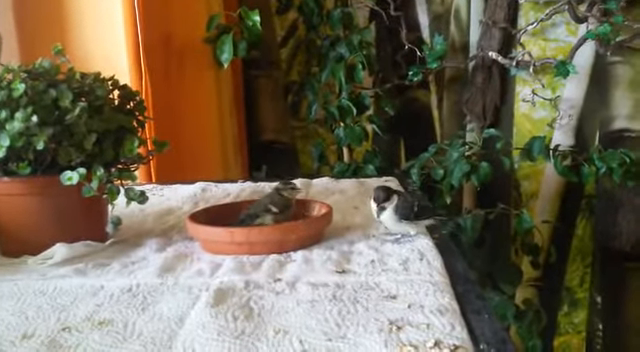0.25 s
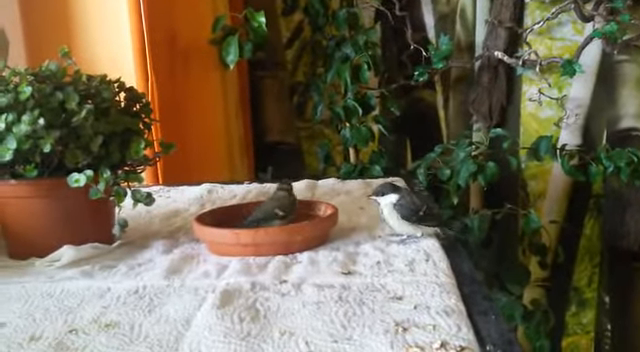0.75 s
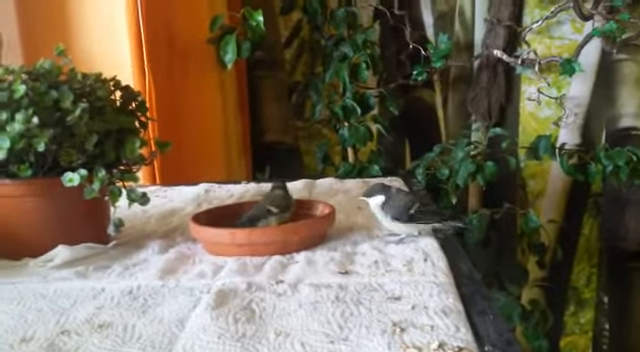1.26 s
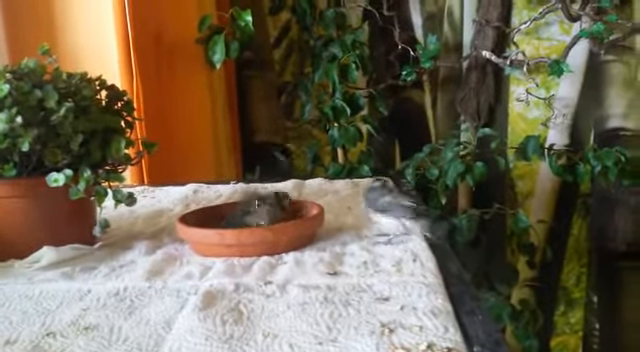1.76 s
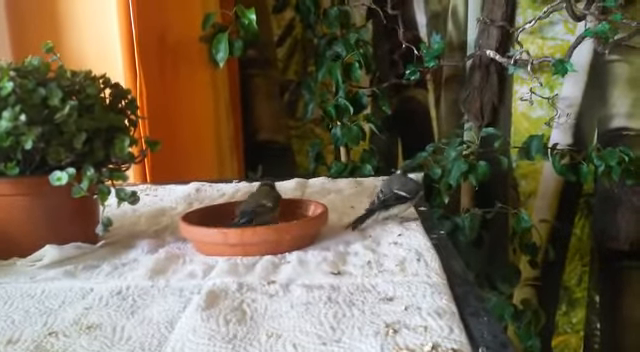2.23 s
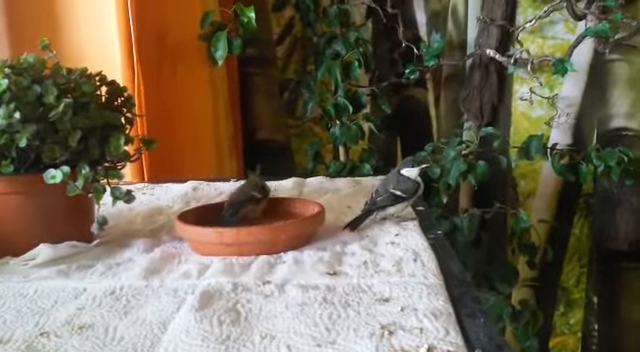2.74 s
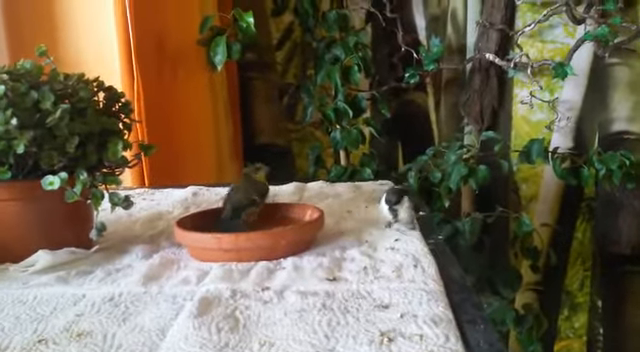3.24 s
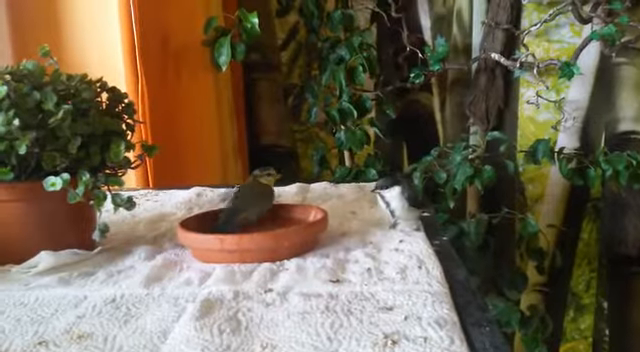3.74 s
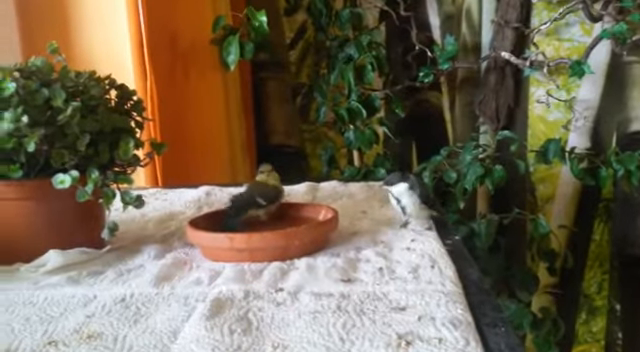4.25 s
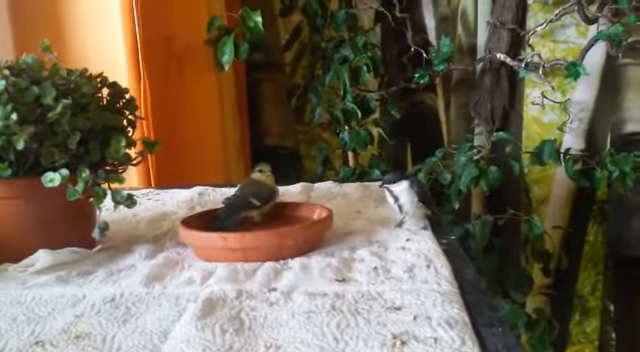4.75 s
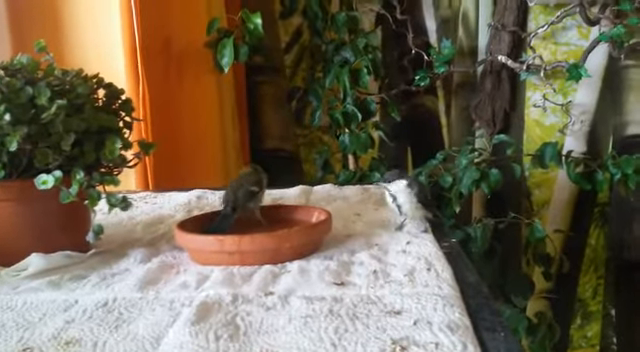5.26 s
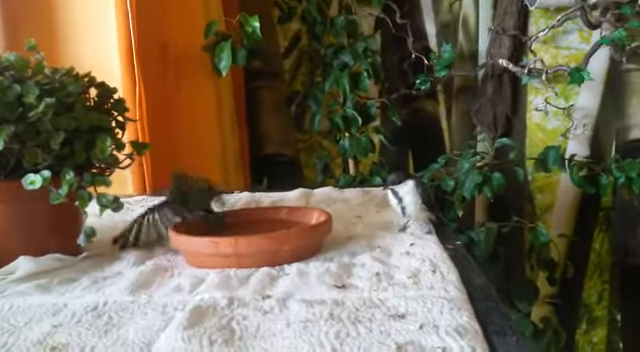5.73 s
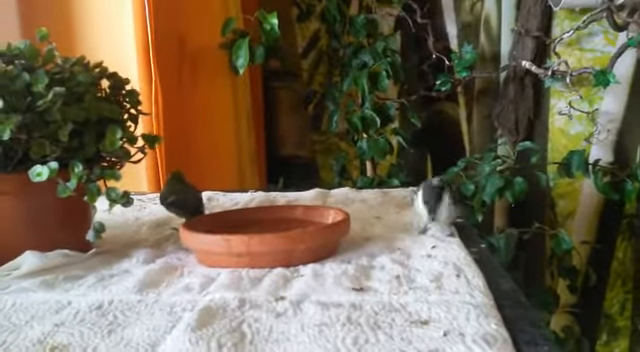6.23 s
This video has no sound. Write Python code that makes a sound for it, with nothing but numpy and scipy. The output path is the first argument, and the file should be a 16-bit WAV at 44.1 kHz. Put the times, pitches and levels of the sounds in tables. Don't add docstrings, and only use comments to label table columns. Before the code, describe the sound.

A small hard-walled room with low hum and thin hiss that rise when something sounds and sink back in the pauses. From 0 to 0.9 s a small bird bathes close by: faint dry feather rustles, brief shaking bouts, light claw ticks and drops on a clay dish. At 0.9-1.5 s a young tit, slightly further off and more echoing, begs with four thin, buzzy, piercing notes around 3-4 kHz with strong overtones near 7 kHz, each jumping up then settling, the last longest. From 1.55 to 2.5 s come more ticks, wing flicks and soft shakes; sharp taps at 2.8 s, a small flick at 3.3 s. The second four-note phrase comes at 3.8-4.4 s, then near quiet. Around 5.2 s a flick and tick; at 5.6-6.3 s the third phrase, with a wing flutter, a clear tap and soft low air thumps, fading into room noise by 6.5 s.

```python
import sys
import numpy as np
from scipy import signal
from scipy.fft import rfft, irfft, next_fast_len
from scipy.io import wavfile
from scipy.ndimage import uniform_filter1d, map_coordinates

SR = 44100
rng = np.random.default_rng(int(sys.argv[2]) if len(sys.argv) > 2 else 0)


def store_wav(level_fs):
    pcm = np.round(np.clip(np.atleast_2d(level_fs), -1, 1) * 32767)
    wavfile.write(sys.argv[1], SR, pcm.T.astype(np.int16))


def invert_db(x):
    u = np.asarray(x, float) / 20
    return 10 ** u


N = 286191
T = np.arange(N) / SR

# (start [s], length [s], first-order lines [dB], second-order lines [dB], arch top [Hz])
BEGGING_NOTES = [(0.907, 0.0895, -47, -40.5, 3670), (1.032, 0.098, -42.5, -37.5, 3811),
                 (1.181, 0.115, -38.5, -35.5, 4028), (1.386, 0.14, -39, -39.5, 4120),
                 (3.785, 0.089, -49.5, -48, 3617), (3.912, .108, -43, -42, 3900),
                 (4.076, 0.12, -40, -38, 4053), (4.282, .12, -41.5, -38.5, 4068),
                 (5.627, 0.09, -46, -43.5, 3538), (5.755, .105, -42, -44.5, 3889),
                 (5.921, 0.14, -38.5, -37.5, 3974), (6.161, .144, -38.5, -38, 4244)]
# (upper voice [Hz], lower voice [Hz], push peak [share of note],
# swell up to it [dB], upper voice at the arch [dB])
PHRASE_PLACES = [
    (3570, 3207, 0.32, 3.5, 2),
    (3645, 3288, .5, 2, -1.7),
    (3630, 3292, .64, 7, -2.1),
    (3612, 3262, 0.81, 8, 1),
]
VOICE_LINES = [(1, 0), (0, 1), (2, -1), (3, -2), (-1, 2), (2, 0), (1, 1), (0, 2), (-1, 3), (3, -1), (3, 0),
               (2, 1), (1, 2), (0, 3), (2, 2), (1, 3), (3, 1)]
ARCH_LINE_DB = [0, -4.5, -14.5, -38, -14.5, -5.5, -14, -3, -11.5, -28, -27, -36, -29.5, -33, -40, -61,
                -32.5]
LOCKED_LINE_DB = [-.8, -11, -7.5, -21, -15, -11.5, -7.5, 1.8, -5, -17.5, -29.5, -44, -31, -26.5, -35, -26,
                  -42]
# (frequency [Hz], level [dB])
BREATH_SPECTRUM = [(2300, -58), (2900, -1), (4000, -8.5), (5200, 7), (7000, -9), (8000, -22), (8600, -2),
                   (14000, -37.5)]
# (frequency [Hz], gain [dB])
THROAT_GAIN = [(2300, -26), (2800, -9.5), (3200, -3.5), (3600, -2), (4300, 1.5), (5200, -4.5), (6500, -0.5),
               (7400, 0), (8100, -0.5), (8500, -23), (9500, -1.5), (14000, 0.5)]
# (start [s], hold [s], level [dB], rise time per 20 dB [s], fall time per 20 dB [s])
SHAKING_BOUTS = [(.001, 0.021, -68.5, -8.34, .021), (.244, 0.044, -71, 0.5, 0.58),
                 (.36, .234, -63.5, 0.3, .025), (.775, .021, -64, .04, 0.4), (.82, .035, -59.5, .1, .05),
                 (1.6, 0.093, -75, .021, .11), (1.708, .003, -65.5, 0.3, 0.33),
                 (2.3, 0.015, -66.5, 0, 0.14), (2.428, .03, -67, 0.1, 0.22)]
# (time [s], level [dB])
WING_FLICKS = [(1.84, -58), (1.992, -66.5), (2.066, -63.5), (3.258, -71), (3.293, -62), (5.18, -63),
               (5.64, -61.5)]
# (frequency [Hz], level [dB])
FEATHER_SPECTRUM = [(900, -24), (1400, -4.5), (2300, -7), (3300, -4.5), (4600, 0.5), (5600, 0.5),
                    (6800, -6), (8500, -11.5), (11000, -15), (14500, -17)]
# (time [s], peak [dB], ring [Hz], ring level [dB])
CLAW_TICKS = [(.0314, -59, 6130, 0.5), (.1612, -60, 5300, 3), (.2029, -59, 5160, 4.18),
              (.256, -64, 5150, 15), (.5304, -58, 3950, 0.5), (.5884, -56.5, 3640, 1.2),
              (.7638, -54, 5030, -6.68), (1.5654, -51, 3624, 7), (1.7087, -51, 4770, 1),
              (1.7665, -58.5, 4650, 6), (1.9906, -52.5, 5070, -5), (2.0584, -59, 3810, 6),
              (2.071, -65, 4940, -6), (2.243, -62, 6850, 7), (2.308, -60, 4260, 6), (2.32, -53.5, 4480, -2),
              (3.115, -68, 4030, 4), (3.2954, -65, 5230, 4.36)]
# (time [s], peak [dB], ring [Hz], ring level [dB])
DROP_TICKS = [(.0097, -52, 3910, -8), (0.4368, -61, 4140, 13.5), (.4668, -49.5, 4150, 2),
              (1.715, -44, 4700, -13), (1.8381, -49.5, 4100, 2.5), (2.4157, -58, 5460, 8),
              (2.7802, -51.5, 6695, -.5), (2.8073, -45.5, 4695, 12.5), (2.8416, -55, 4700, -7),
              (3.2842, -61, 4330, 5), (5.1757, -52.5, 3900, -1), (5.5081, -62, 6790, -1.2),
              (5.6874, -47, 3670, 8.5)]
# (frequency [Hz], level [dB])
CRACK_SPECTRUM = [(1500, -23), (3000, -1), (6000, -0.5), (10000, -4.5), (14000, -10)]
# (frequency [Hz], level [dB])
KNOCK_SPECTRUM = [(250, -27), (600, -4), (1200, -12.5), (2400, -11), (4500, -36)]
# (time [s], peak [dB], pitch [Hz], length [s])
AIR_THUMPS = [(5.75, -49.5, 199, 0.047), (4.42, -53, 84, 0.0525), (5.98, -56, 404, 0.0474),
              (3.32, -59.5, 207, 0.048), (2.04, -62, 390, 0.092), (1.8, -66, 680, 0.03),
              (1.9, -63, 250, 0.086), (1.15, -58, 230, 0.044), (.98, -60.5, 335, 0.52),
              (.03, -64.5, 330, 0.094)]
# (delay [s], level [dB])
WALL_ECHOES = [(.0042, -5), (.0078, -13), (.011, -14.5), (.016, -27), (.023, -15.5)]
# (frequency [Hz], time to fall 60 dB [s])
ROOM_DECAY = [(300, 0.26), (3500, 0.3502), (7000, 0.24), (13000, 0.12)]
# (frequency [Hz], level [dB])
ROOM_NOISE_SPECTRUM = [(12, -27), (20, -18), (27, -13.5), (114, -3.5), (262, -7), (407, -11), (442, -12),
                       (883, -17), (1160, -18.5), (1710, -20), (2980, -22.5), (3930, -24.5), (14800, -29.5)]
# (time [s], room noise level [dB])
HOUSE_STIR = [(0, 2.5), (.6, 1.5), (1.9, 1.5), (2.45, 2.5), (2.7, 0.2), (3.35, 1), (3.65, -0.6), (5, 0.24),
              (6.49, 0.5)]


def unit(x):
    return x / np.sqrt(np.mean(x ** 2) + 1e-20)


def along(points, hz):
    f, v = np.transpose(points)
    return np.interp(np.log(hz + 1), np.log(f + 1), v)


def wobble(rate, size=N):
    knots = rng.standard_normal(int(size * rate / SR) + 4)
    return map_coordinates(knots, [np.arange(size) * rate / SR])


def coloured(x, gain):
    m = next_fast_len(len(x) + 8192)
    return unit(irfft(rfft(x, m) * gain(np.fft.rfftfreq(m, 1 / SR)), m)[:len(x)])


def fade(t, edge):
    return np.clip(np.minimum(t - t[0], t[-1] - t) / edge, 0, 1)


def begging():
    out = np.zeros(N)
    for (start_s, *row), place in zip(BEGGING_NOTES, PHRASE_PLACES * len(BEGGING_NOTES)):
        sound = note(*row, *place)
        out[round(start_s * SR):][:len(sound)] += invert_db(-2.5) * sound
    return irfft(rfft(out) * invert_db(along(THROAT_GAIN, np.fft.rfftfreq(N, 1 / SR))), N)


def note(length, first_db, second_db, top_hz, upper_hz, lower_hz, peak_share, swell_db, lead_db):
    t = np.arange(round(length * SR)) / SR
    top_s, breath_db = 0.033, -14.5
    push = top_hz / upper_hz - 1
    firm = min(push, 0.12)
    upper = arch(t, top_s, top_hz, upper_hz, depth=0.13 + 1.3 * firm, settle=0.007)
    lower_top_hz = lower_hz + 0.6 * (top_hz - upper_hz)
    lower = arch(t, top_s + 0.005, lower_top_hz, lower_hz, depth=0.08 + 0.55 * firm, settle=0.009)
    locked = np.clip((t - top_s - 0.004) / 0.0094, 0, 1)
    jitter = 0.008 + 0.01 * np.clip(1 - t / top_s, 0, 1)
    turns = []
    for hz in (upper, lower):
        unsteady_hz = hz * (1 + 0.003 * wobble(60, len(t)) + jitter * wobble(700, len(t)))
        turns.append(2 * np.pi * np.cumsum(unsteady_hz) / SR)
    first_shape_db, second_shape_db = effort(t, length, peak_share, swell_db)
    first, second = invert_db(first_db + first_shape_db), invert_db(second_db + second_shape_db)
    breath = coloured(rng.standard_normal(len(t)), lambda hz: invert_db(along(BREATH_SPECTRUM, hz)))
    tone = invert_db(breath_db) * (first + second) * breath
    for (m, n), early_db, db in zip(VOICE_LINES, ARCH_LINE_DB, LOCKED_LINE_DB):
        if (m, n) == VOICE_LINES[0]:
            early_db = early_db + lead_db
        if m > 1:
            early_db = early_db + 60 * (firm - 0.12)
        level_db = early_db + locked * (db - early_db) + 3 * wobble(68.0, len(t))
        strength = first if m + n == 1 else second
        line = np.sin(m * turns[0] + n * turns[1] + rng.uniform(0, 2 * np.pi))
        tone += strength * invert_db(level_db) * line
    return tone * fade(t, 0.0034)


def arch(t, top_s, top_hz, rest_hz, depth, settle):
    rise = top_hz * (1 - depth * np.clip(1 - t / top_s, 0, 1) ** 1.2)
    sunk = 1 - np.exp(-(np.maximum(t - top_s, 0) / settle) ** 2)
    return rise + (rest_hz - top_hz) * sunk


def effort(t, length, peak_share, swell_db):
    attack_s, first_attack_db, second_attack_db = 0.02924, 24, 16.5
    first_release_db, second_release_db = 11.5, 17.5
    peak_s = max(peak_share * length, attack_s + 0.002)
    s = [attack_s, peak_s, length]
    sag_db = 74 * (peak_s - attack_s)
    shut = np.clip(1 - t / attack_s, 0, 1) ** 1.83
    first_db = np.interp(t, s, [0, -sag_db, -sag_db - first_release_db]) - first_attack_db * shut
    second_db = np.interp(t, s, [-swell_db, 0, -second_release_db]) - second_attack_db * shut
    return first_db, second_db


def rustle():
    sparks = rng.standard_normal(N) * invert_db(3.2 * wobble(900) + 1.7 * wobble(45))
    grains = coloured(sparks, lambda hz: invert_db(along(FEATHER_SPECTRUM, hz)))
    flick_rise_s, flick_fall_s = 0.0123, 0.0098
    moves = SHAKING_BOUTS + [(s, 0, db, flick_rise_s, flick_fall_s) for s, db in WING_FLICKS]
    t = T[::32]
    level_db = []
    for s, hold, db, rise, fall in moves:
        before_db = 20 * np.maximum((s - t) / rise, 0)
        after_db = 20 * np.maximum((t - s - hold) / fall, 0)
        level_db.append(db - before_db - after_db)
    return invert_db(-0.5 + np.interp(T, t, np.max(level_db, axis=0))) * grains


def ticks():
    out, t = np.zeros(N), np.arange(SR // 6) / SR
    claw_knock_db, drop_knock_db = 1.1, -18.5
    contacts = [(*row, claw_knock_db) for row in CLAW_TICKS]
    contacts += [(*row, drop_knock_db) for row in DROP_TICKS]
    ring_decay = invert_db(-60 * t / 0.0093) + invert_db(-27.5 - 60 * t / 0.13)
    ring_shape = ring_decay * (1 - np.exp(-t / 0.00034))
    crack_shape = invert_db(-1.0 - 60 * t / 0.0022) + invert_db(-9.5 - 60 * t / 0.023)
    for s, db, ring_hz, ring_db, knock_db in contacts:
        crack = coloured(rng.standard_normal(len(t)), lambda hz: invert_db(along(CRACK_SPECTRUM, hz)))
        knock = coloured(rng.standard_normal(len(t)), lambda hz: invert_db(along(KNOCK_SPECTRUM, hz)))
        ring = np.sin(2 * np.pi * ring_hz * t) * invert_db(ring_db) * ring_shape
        dull = invert_db(knock_db - 2.5 - 60 * t / 0.025) * knock
        out[round(s * SR):][:len(t)] += invert_db(db) * (crack_shape * crack + ring + dull)
    return out


def thumps():
    out = np.zeros(N)
    for s, db, hz, length in AIR_THUMPS:
        near = abs(T - s) < 0.6
        t = T[near] - s
        turn = 2 * np.pi * hz * t + 2.2 * wobble(hz / 3, len(t))
        out[near] += invert_db(db) * np.exp(-(t / length) ** 2 * 4) * np.sin(turn)
    return out


def room(x, wet_db):
    out, step = x.copy(), SR // 2
    for s, db in WALL_ECHOES:
        out[round(s * SR):] += invert_db(db) * x[:-round(s * SR)]
    for a in range(0, N, step):
        hz, t, z = signal.stft(rng.standard_normal(step), SR, nperseg=256)
        decay = invert_db(-60 * t / along(ROOM_DECAY, hz)[:, None])
        tail = signal.istft(z * decay, SR, nperseg=256)[1]
        tail = tail * np.clip(np.arange(len(tail)) / (0.0165 * SR), 0, 1)
        echo = signal.fftconvolve(x[a:a + step], tail / np.linalg.norm(tail))
        out[a:a + len(echo)] += invert_db(wet_db) * echo[:N - a]
    return out


def gate(sound):
    threshold_db, knee_db, span_db = -67.5, 3.5, 16.5
    listen_s, glide_s, lag_s = 0.031, 0.068, 0.015
    power = uniform_filter1d(sound ** 2, round(listen_s * SR), mode="nearest")
    over_db = 10 * np.log10(abs(power) + 1e-12) - threshold_db
    opening = np.tanh(knee_db * np.logaddexp(0, over_db / knee_db) / span_db)
    return np.interp(T - lag_s, T, uniform_filter1d(opening, round(glide_s * SR), mode="nearest"))


def background(opening):
    def hum(hz):
        return 1 / (1 + (hz / 500) ** 4)

    def murmur(hz):
        return 1 / (1 + (500 / (hz + 1)) ** 4) / (1 + (hz / 4000) ** 4)

    def hiss(hz):
        return 1 / (1 + (4000 / (hz + 1)) ** 4)

    # (power share, level with gate shut [dB], gain with gate open [dB], lift [dB])
    bands = [(hum, -73, 11.5, 0.5), (murmur, -78, 13.5, 2.5), (hiss, -80, 14.5, 6)]
    stir_db = np.interp(T, *np.transpose(HOUSE_STIR))
    out = 0
    for share, shut_db, open_db, lift_db in bands:
        noise = coloured(rng.standard_normal(N),
                         lambda hz: invert_db(along(ROOM_NOISE_SPECTRUM, hz)) * np.sqrt(share(hz)))
        level_db = shut_db + stir_db + open_db * opening + lift_db + 0.9 * wobble(14)
        out = out + invert_db(level_db) * noise
    return out


def thin_faint_bands(x, reach_db, scatter_db):
    hz, t, z = signal.stft(x, SR, nperseg=2048, noverlap=1536)
    band_db = 10 * np.log10(uniform_filter1d(abs(z) ** 2, size=9, axis=1) + 1e-20)
    luck = uniform_filter1d(rng.standard_normal(z.shape), size=13, axis=1)
    luck = uniform_filter1d(luck, size=5, axis=2)
    bar_db = band_db.max(axis=1, keepdims=True) - reach_db + scatter_db * unit(luck)
    bar_db = bar_db - 12000 / (hz[:, None] + 300)
    keep = 1 / (1 + invert_db(np.clip(4 * (bar_db - band_db), -60, 60)))
    return signal.istft(z * keep, SR, nperseg=2048, noverlap=1536)[1][:, :N]


def scene():
    calls = room(begging(), wet_db=-2.0)
    feathers, pushes = rustle(), thumps()
    opening = gate(calls + invert_db(2.5) * feathers + pushes)
    dish = room(ticks() + feathers, wet_db=-10)
    return (calls + dish + pushes + background(opening))[None]


def top_cut(x):
    return signal.sosfilt(signal.butter(12, 15030, fs=SR, output="sos"), x)


def record(dry):
    limited = irfft(rfft(dry) * (np.fft.rfftfreq(N, 1 / SR) < 14600), N)
    thinned = thin_faint_bands(limited, reach_db=32, scatter_db=4.5)
    return top_cut(thinned)


dry = scene()
out = record(dry)
store_wav(out)
```